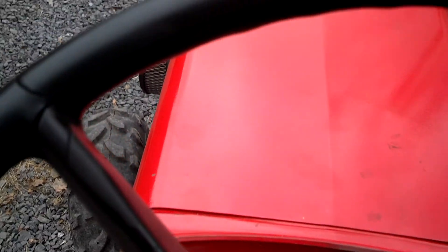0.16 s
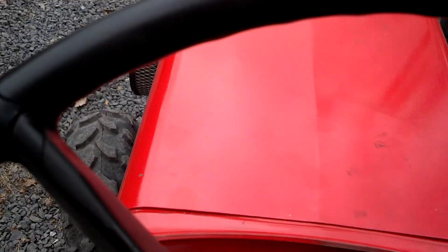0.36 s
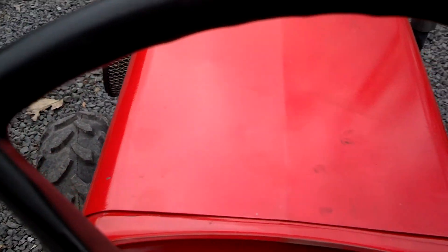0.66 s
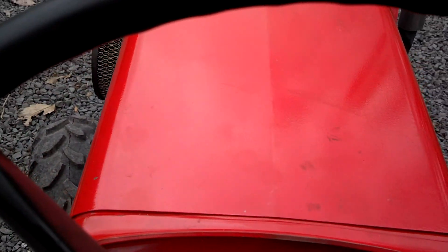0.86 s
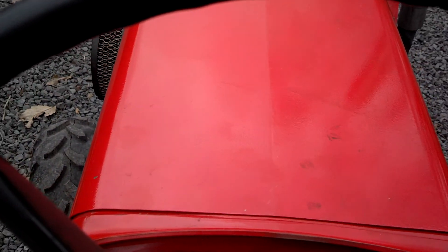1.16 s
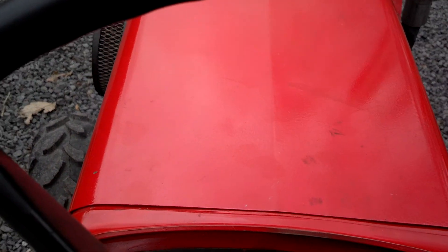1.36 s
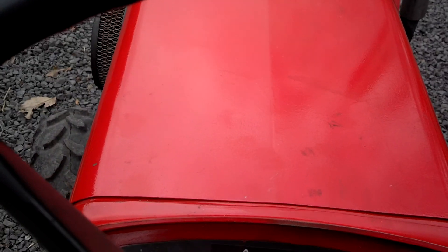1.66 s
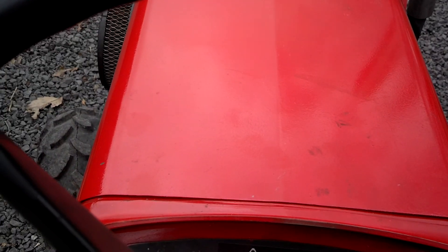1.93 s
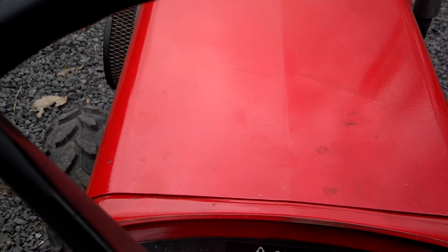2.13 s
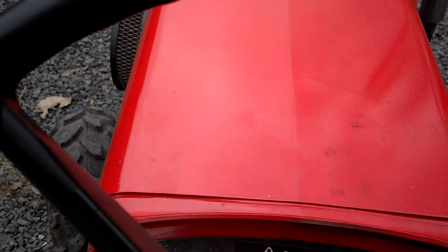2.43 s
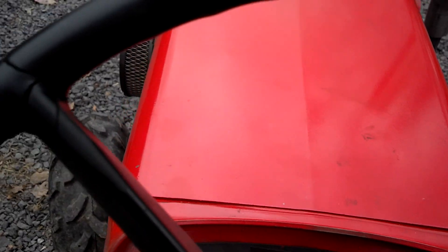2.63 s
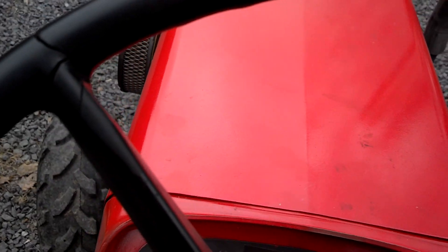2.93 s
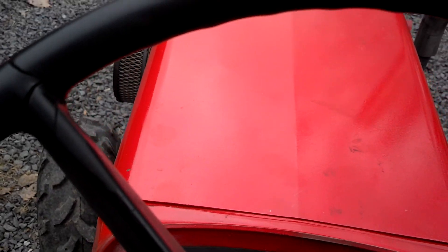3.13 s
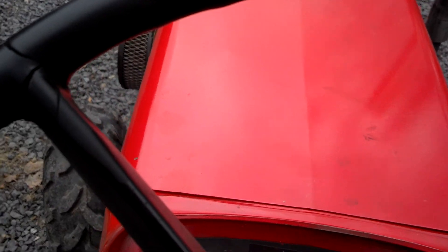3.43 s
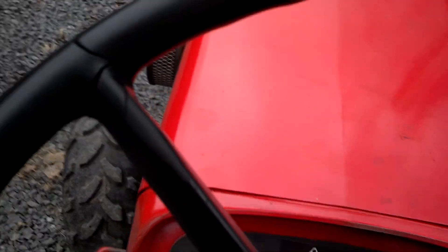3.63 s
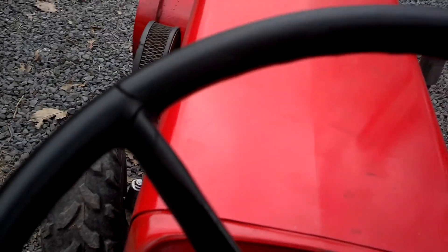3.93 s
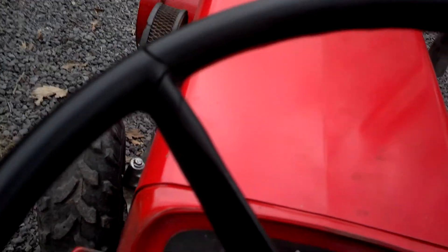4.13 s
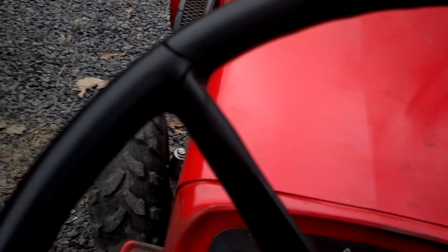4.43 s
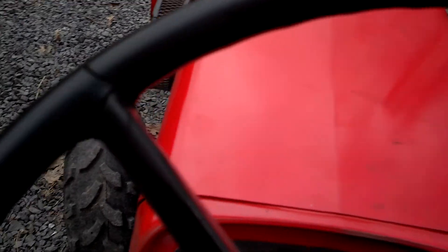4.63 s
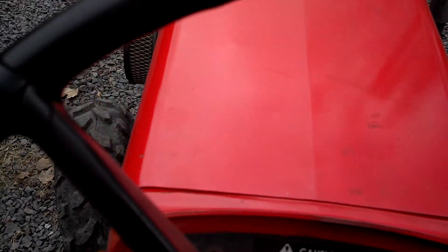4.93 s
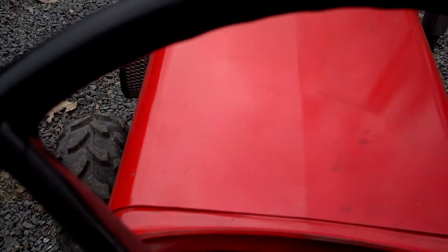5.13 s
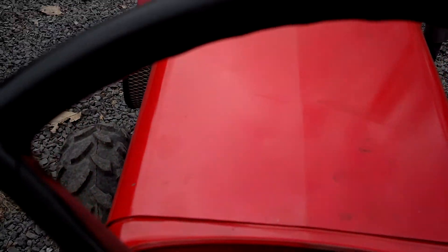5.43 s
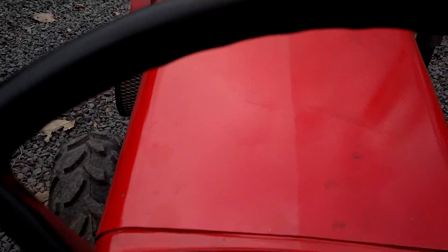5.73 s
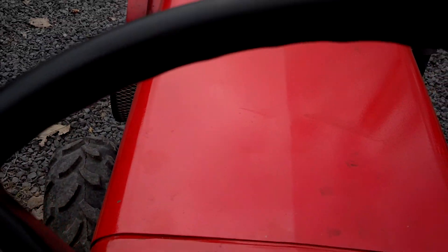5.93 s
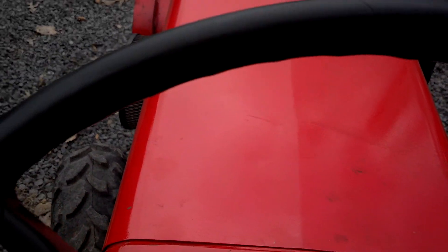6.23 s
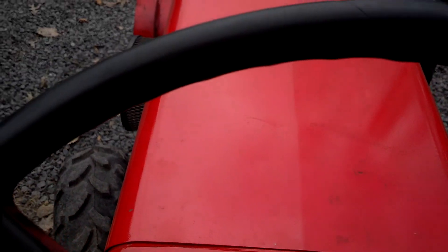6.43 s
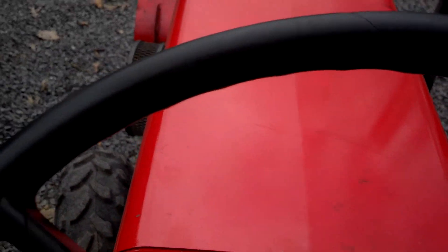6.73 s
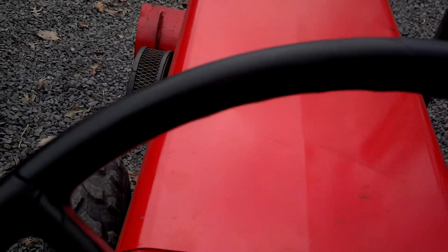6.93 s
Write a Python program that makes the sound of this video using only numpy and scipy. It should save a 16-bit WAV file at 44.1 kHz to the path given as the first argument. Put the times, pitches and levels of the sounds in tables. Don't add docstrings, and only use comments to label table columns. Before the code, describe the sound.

Key click and pinion clunk, then a grinding, thumping engine crank that never fires; a brief clattering pause and a second, wearier failed try.

```python
import sys
import numpy as np
from scipy import signal
from scipy.fft import rfft, irfft, next_fast_len
from scipy.io import wavfile
from scipy.ndimage import uniform_filter1d, map_coordinates

SR = 44100
rng = np.random.default_rng(int(sys.argv[2]) if len(sys.argv) > 2 else 0)


def generate_wav(signal):
    frames = np.transpose(np.atleast_2d(signal))
    scaled = np.clip(frames, -1, 1) * 32767
    pcm = np.round(scaled).astype(np.int16)
    wavfile.write(sys.argv[1], SR, pcm)


def elevation(decibels):
    levels = np.asarray(decibels, float)
    return 10 ** (levels / 20)


N = 312081
TIME = np.arange(N) / SR

# start_s, level_db
AIR_GAIN = [
    (2.5, -55),
    (3.0, -46.5),
    (3.32, -43.5),
    (3.46, -43.5),
    (3.58, -34),
    (3.7, -40.5),
    (3.9, -37),
    (4.8, -37),
    (4.95, -71),
]
# pitch_hz, level_db (per Hz)
RUMBLE = [(25, -53), (60, -3.5), (120, 0.5), (200, 0.5), (350, -2), (700, -7.5), (1200, -15), (2500, -27.5),
          (5000, -74)]
HISS = [(800, -5), (2500, 2), (5000, -7.5), (8000, -12.5), (12000, -12.5), (16000, -7)]
HISS_UNDER_DB = -14

# start_s, level_db (peak), pitch_hz (band centre), t60_s
TICKS = [(0.0004, -18, 13700, 0.019), (2.572, -40, 9000, .04), (2.754, -48, 8940, 0.021),
         (3.031, -38, 11000, 0.029), (3.3455, -49, 5000, 0.013), (3.5035, -41, 12000, 0.16),
         (3.572, -25, 12700, 0.022), (3.867, -41, 8500, .03), (3.8785, -34, 12000, 0.013),
         (3.88, -43, 13000, .03), (3.9, -42, 13500, .08), (4.391, -44, 11000, 0.022),
         (4.8057, -33, 11000, 0.013), (4.8133, -14, 14000, 0.0076), (4.8143, -30, 13540, 0.026),
         (4.8174, -25, 13000, 0.012), (2.4579, -28, 14540, 0.1), (7.06, -44, 11000, 0.046)]
# start_s, level_db (peak), pitch_hz (centre), t60_s
CLICKS = [(0.0162, -2.5, 8200, 0.016), (0.0824, -44, 9700, 0.044), (2.4573, -11, 9360, 0.055),
          (2.939, -34.5, 4390, 0.27), (3.3455, -32, 2530, 0.037), (3.3672, -41, 4020, 0.027),
          (3.502, -21, 4630, 0.097), (3.572, -18, 3500, 0.024), (3.8785, -28, 4500, 0.02),
          (4.3901, -22.5, 6800, 0.03), (4.8285, -4.5, 6180, 0.028), (4.8718, -19, 4700, 0.067),
          (6.6884, -13, 9770, 0.098), (6.853, -38, 2534, 0.04), (7.058, -42, 4560, 0.037)]
# pitch_hz, width_hz, level_db
SWITCH_BODY = [(1870, 450, 8), (4500, 340, 2), (5600, 310, 0), (9100, 360, 6), (10400, 480, -9),
               (14000, 230, -22)]
# start_s, level_db (peak), pitch_hz, t60_s
TINGS = [(.0165, -30, 9100, .046), (.017, -26, 4400, .054), (.018, -28, 6000, .042), (2.599, -47, 3000, .4),
         (2.935, -54, 3350, .4), (3.028, -49, 4700, .04), (4.829, -24, 6950, .03), (4.812, -38, 4200, .04),
         (2.96, -51, 2860, .4), (2.938, -44, 4400, .06), (3.05, -48, 2780, .1), (3.37, -35, 345, .1),
         (3.368, -45, 1750, .08), (3.346, -39, 750, .04), (3.757, -39, 1050, .04), (3.912, -33, 1150, .08),
         (3.925, -33, 600, .1), (3.503, -20, 250, .07), (.345, -33, 2250, .6), (3.503, -13, 680, .07),
         (3.508, -19, 480, .04), (3.503, -24, 620, .08), (3.525, -26, 295, .32), (3.59, -25, 252, .19),
         (3.66, -25, 307, .13), (3.68, -22.5, 287, .13), (3.906, -24, 700, .04), (3.907, -34, 2050, .06),
         (3.93, -27, 326, .1), (4.389, -44, 3450, .08), (4.389, -48, 8750, .18), (4.4, -52, 9600, .16),
         (4.665, -52, 6100, .14), (5.545, -11, 490, .044), (5.543, -14, 965, .06), (5.61, -31, 790, .3),
         (5.72, -31, 725, .3), (4.389, -30, 1650, .03), (4.831, -26, 10700, .03), (4.832, -28, 5600, .07),
         (5.5465, -15.5, 3650, .032), (5.5465, -17, 3400, .037), (5.551, -16, 3180, .054)]
# start_s, level_db (peak)
JINGLES = [
    (4.641, -45.5),
    (4.719, -45.5),
]
# pitch_hz, level_db, t60_s
KEY_MODES = [(3270, -3, .13), (3440, 0, .18), (5750, -16, .12), (6100, -9, .12)]

# start_s, level_db (peak), pitch_hz, t60_s
CLUNKS = [(0.053, -23.5, 332, 0.34), (0.058, -14.5, 189, 0.2), (2.845, -26, 340, 0.059),
          (2.9, -30, 338.5, 0.095), (4.868, -17, 409, 0.14), (2.482, -26, 298.6, 0.26),
          (2.601, -30, 370, 0.047), (2.663, -22, 285, 0.05), (2.87, -32, 303.6, 0.089),
          (3.344, -37, 320, 0.13), (3.501, -17, 236, 0.19), (3.908, -30, 280, 0.23),
          (4.387, -28, 244, 0.18), (4.869, -11, 192, 0.076), (5.537, -17, 935, 0.12),
          (5.77, -22, 80.54, 0.31), (4.855, -20.5, 322, 0.2), (4.893, -24, 223, 0.36),
          (6.713, -15.5, 297.6, 0.11), (6.728, -20.5, 204.6, 0.12), (6.787, -30, 380, 0.077),
          (6.85, -17, 920, 0.049), (6.93, -22, 278.7, 0.067), (7.043, -25, 1030, 0.1)]
CLUNK_RISE_S = 0.0013

# start_s, level_db (load)
ENGAGE = [
    (.1, -55),
    (4.9, -62),
]
# start_s, level_db (load), rise_s, t60_s
SCRAPES = [(.054, -27.5, 0.018, 0.3), (.22, -49, 0.073, 0.5), (2.598, -33, 0.012, 0.083),
           (2.782, -43, 0.015, 0.23), (2.825, -39, 0.01, 0.34), (2.885, -39, 0.017, 0.31),
           (2.94, -46, 0.02, 0.19), (4.84, -30, 0.0015, 0.61), (4.88, -44, 0.0085, 0.19),
           (5.55, -41, 0.0051, .2), (6.85, -41.5, 0.0062, 0.47), (6.97, -41, 0.019, 0.57),
           (7.07, -38, 0.019, 0.29)]
# start_s, pitch_hz (tooth mesh), whine_db, load_db
SPIN_FIRST = [
    (0.28, 335.5, -62, -41.5),
    (.32, 373.8, -33.5, -37),
    (.35, 423, -26.5, -36),
    (0.385, 467.5, -22, -32),
    (0.421, 518.7, -24.5, -28.5),
    (.465, 501.4, -19.5, -29.5),
    (.53, 518, -25.5, -29.5),
    (0.57, 536.6, -39, -30.5),
    (.606, 509, -22, -29),
    (.66, 526.3, -31, -30),
]
SPIN_SECOND = [(4.985, 358.4, -38, -45), (5.045, 373, -31, -33.5), (5.075, 390, -26.5, -37.5),
               (5.106, 383.3, -34.5, -38), (5.131, 371.6, -30, -46), (5.157, 379.3, -36, -36),
               (5.174, 456.3, -22, -31.5), (5.25, 453.5, -19.5, -31.5), (5.279, 487.7, -21, -30),
               (5.305, 504.6, -27, -24.5), (5.335, 518.5, -21.5, -29), (5.375, 518, -34, -31.5),
               (5.41, 537, -33, -29), (5.53, 577, -32, -27.5)]
# start_s, pitch_hz (tooth mesh), whine_db, load_db
RUN_FIRST = [
    (.74, 593, -41.5, -29),
    (.87, 618.2, -32, -29),
    (1.05, 655.4, -31, -26.5),
    (1.3, 665, -27.5, -25),
    (1.651, 665, -29, -24.5),
    (1.95, 663.6, -25.5, -25),
    (2.05, 663, -30, -27),
    (2.46, 660.3, -29.5, -24),
]
RUN_SECOND = [
    (5.62, 599, -58, -29),
    (5.8, 652.6, -39, -26.5),
    (5.95, 672, -38, -26.5),
    (6.1, 668, -33.5, -26.5),
    (6.23, 664.5, -27.5, -27),
    (6.399, 656.6, -31.5, -26.5),
    (6.69, 648, -28.5, -24),
]
SAG_DB, SAG_AFTER_S, SAG_WIDTH_S = -2, 0.069, 0.013
RELEASE_DROP_DB, COAST_DB_PER_S = -6, -49

ORDERS_CLEAN = [2, -7, -10, -9.5, -11]
ORDERS_CHATTER = [-2, -2.5, -16, -40, -16.5]
# mesh_multiple, level_db
HALF_ORDERS = [(1.5, -17), (2.5, -15.5), (3.5, -28)]
# pitch_hz, level_db
HOUSING = [(450, 0), (770, 2.5), (920, 4.5), (1190, 9), (1340, -6), (1500, 6), (1810, -7), (2050, 5.5),
           (2170, 0), (2260, 11.5), (2350, -6)]
OVERTONES_GROW, FULL_WHINE_DB = 0.26, -10.5
STALL_HZ, STALL_FLUTTER_DB = 447, -0.5
SECOND_TRY_S, TIRED_JITTER, TIRED_DB = 4, 0.0025, -5

# pitch_hz, width_hz, level_db
CASING = [(192, 83, -3), (360.4, 34, 2), (438.5, 13.7, -1.5), (620, 134, -1.5), (648, 12, 1),
          (755, 34, -2.5), (890, 28, 2), (987, 54, 7), (1030, 19, 8.5), (1150, 32, 2), (1213, 34, 2.5),
          (1329, 11, 2), (1387, 200, 1), (1525, 56, 0), (1663, 35, 5), (1787, 25, 2), (1975, 128, 2.5),
          (2233, 35, 3), (2355, 34, 3.5), (2476, 24, 0), (2998, 58, 4), (3390, 220, -5.5), (3600, 25, -5),
          (3861, 34, 4), (3970, 17, 4), (4390, 260, 0), (5410, 830, 0), (7040, 133, 2), (7050, 830, -0.5),
          (10040, 170, -23), (10400, 3400, -9.5), (12700, 630, -4.5), (14400, 930, -4.5), (16400, 130, -11)]
# start_s, level_db, rise_s, t60_s
RASPS = [
    (5.62, -39, 0.045, 1.85),
]
# start_s, level_db, rise_s, t60_s
SCUFFS = [(.04, -48, .005, 0.19), (.088, -37.5, 0.021, 0.076), (2.47, -45, 0.004, 0.1),
          (2.59, -52, 0.083, 0.2), (3.03, -49, 0.021, 0.17), (4.88, -41.5, 0.02, 0.19),
          (5.55, -48, 0.0058, 1), (5.3, -55, 0.11, 0.51), (6.7, -35, 0.0074, 0.076), (6.79, -51, .04, 0.21),
          (6.935, -58, 0.017, 0.13), (7.07, -56, 0.014, 0.21)]
LOUD_DB = -27
BOOM_DB, BOOM_GROWS, SHAKE_DB = -26.5, 0.73, -11
IDLE_BOOM_DB, STRAIN_DB = -37, 4
CLEAN_BOOM_DB, BOOM_CHATTER_DB = -41, -6
REBOUND_DB, REBOUND_AFTER_S, REBOUND_WIDTH_S = 3.5, 0.109, 0.02
RASP_DB, RASP_GROWS, RASP_CHATTER_DB = -50.5, 1.3, 7.5
FIZZ_DB, FIZZ_GROWS = -56.5, 0.76

# start_s, level_db (peak)
VALVES = [
    (0.487, -23),
    (0.7994, -44),
    (1.1101, -29),
    (1.4276, -28),
    (1.7594, -44),
    (2.0784, -31),
    (5.318, -27.5),
    (5.988, -29),
    (6.3199, -30),
    (6.6343, -25),
]
VALVE_HZ, VALVE_T60_S = 11000, 0.067
# start_s, level_db (peak)
THUMPS = [
    (0.684, -18.5),
    (1.017, -13),
    (1.333, -11.5),
    (1.655, -11),
    (1.966, -12.5),
    (2.291, -11),
    (5.245, -18),
    (5.895, -15),
    (6.208, -11),
    (6.534, -11),
]
THUMP_HZ, THUMP_T60_S, THUMP_RISE_S = 262, 0.05, 0.01
HEAVE_HZ, HEAVE_DB = 94.77, -10

# start_s, level_db (peak)
RATTLES = [(2.52, -32), (2.56, -29), (2.601, -37.5), (2.715, -36), (2.772, -37), (2.82, -32),
           (2.842, -30.5), (2.876, -29), (2.9, -37), (6.76, -31), (6.799, -34), (6.853, -39), (6.901, -37)]
# pitch_hz, level_db, t60_s
GEAR_MODES = [(1020, -1, 0.067), (1410, -5, .05), (1706, 4, 0.085), (1830, 1, 0.058), (2330, -2, 0.042),
              (3020, -9.5, 0.11), (3900, -27, 0.05)]
# start_s, level_db, rise_s, t60_s
RINGS = [
    (2.55, -36.5, 0.033, 0.48),
    (2.78, -39, 0.011, 0.25),
    (2.9, -42.5, 0.052, 1.53),
    (6.726, -32.5, 0.033, 1.22),
    (6.886, -41.5, 0.013, 0.7),
    (7.07, -38, 0.052, 0.35),
]
FLYWHEEL_HZ = 1170

# pitch_hz, level_db, phase_rad (extra)
PORT = [(60, .5, -.1), (95, .5, 0), (130, 2, -.7), (200, 0.5, -1.6), (370, -1.5, -2.25), (430, -4, -2.1),
        (485, -18, -1), (520, -12, .2), (590, -12, -.6), (650, -6, -.5), (950, -1, -.55), (1400, 0, 0),
        (2050, -3, -.1)]
PORT_TREBLE = (3300, .5, .1)
PORT_LAG_S = 16 / SR
SCATTER_DB = -11.5
CEILING, TOP_HZ = 0.48, 15870


def unit(x):
    return x / np.sqrt(np.mean(x ** 2) + 1e-20)


def along(points, hz, column=1):
    p = np.transpose(points)
    return np.interp(np.log(hz + 1), np.log(p[0] + 1), p[column])


def curves(rows):
    s, *columns = np.transpose(rows)
    return [np.interp(TIME, s, column) for column in columns]


def wobble(rate):
    knots = rng.standard_normal(int(N * rate / SR) + 4)
    return map_coordinates(knots, [np.arange(N) * rate / SR])


def filtered(x, response):
    m = next_fast_len(len(x) + 8192)
    return irfft(rfft(x, m) * response(np.fft.rfftfreq(m, 1 / SR)), m)[:len(x)]


def modes(table):
    def response(f):
        return sum((-1) ** k * elevation(db) * 1j * f * width / (hz * hz - f * f + 1j * f * width)
                   for k, (hz, width, db) in enumerate(table))
    return response


def band(lo_hz, hi_hz, order=3):
    return lambda f: 1 / np.sqrt((1 + (lo_hz / (f + 1)) ** (2 * order)) * (1 + (f / hi_hz) ** (2 * order)))


def add(track, s, sound):
    part = track[max(round(s * SR), 0):][:len(sound)]
    part += sound[:len(part)]


def swells(table):
    power = 0
    for s, db, rise, t60 in table:
        before, after = np.minimum(TIME - s, 0), np.maximum(TIME - s, 0)
        power = power + elevation(2 * db - 20 * (before / rise) ** 2 - 120 * after / t60)
    return power


def after_thumps(delay_s, width_s):
    return sum(np.exp(-((TIME - s - delay_s) / width_s) ** 2) for s, _ in THUMPS)


def air():
    def noise(spectrum):
        return unit(filtered(rng.standard_normal(N), lambda f: elevation(along(spectrum, f))))

    rumble_db, = curves(AIR_GAIN)
    lumps = elevation(rumble_db + 0.46 * wobble(18))
    hiss_gain = elevation(rumble_db + HISS_UNDER_DB + 0.8 * wobble(4.63))
    shared = lumps * noise(RUMBLE) + hiss_gain * noise(HISS)
    own = elevation(4.0) * lumps * filtered(noise(RUMBLE), band(28, 700))
    return shared, own


def ticks():
    out, t = np.zeros(N), np.arange(SR // 8) / SR
    for s, db, hz, t60 in TICKS:
        crack = rng.standard_normal(len(t)) * elevation(-60 * t / t60)
        crack = filtered(crack, lambda f: modes([(hz, 0.6 * hz, 0)])(f) ** 2 + 0.26 * band(1500, 17000)(f))
        add(out, s, elevation(db) * crack / np.abs(crack).max())
    return out


def clicks(table, rise, snap):
    out, t = np.zeros(N), np.arange(SR // 8) / SR
    for s, db, hz, t60 in table:
        crack = rng.standard_normal(len(t)) * elevation(-60 * t / t60) * (1 - np.exp(-t / rise))
        crack[8] += snap

        def body(f):
            tilt = modes([(hz, 0.7 * hz, 0)])(f) + 0.35
            return (modes(SWITCH_BODY)(f) + 0.4) * tilt * band(700, 17000)(f)

        crack = filtered(crack, body)
        add(out, s, elevation(db - 6.5) * crack / np.abs(crack).max())
    return out


def tings():
    out, t = np.zeros(N), np.arange(SR // 2) / SR
    jingles = [(s, db + mode_db, hz, t60) for s, db in JINGLES for hz, mode_db, t60 in KEY_MODES]
    for s, db, hz, t60 in list(TINGS) + jingles:
        envelope = elevation(db - 60 * t / t60) * (1 - np.exp(-t / 0.00078))
        add(out, s, envelope * np.sin(2 * np.pi * hz * t))
    return out


def thuds(table, rise, noise_db, top_hz):
    out, t = np.zeros(N), np.arange(SR // 4) / SR
    for s, db, hz, t60 in table:
        attack = 1 - np.exp(-(t / max(rise, 0.001)) ** 2)
        shape = attack * elevation(-60 * np.maximum(t - rise, 0) / t60)
        puff = unit(filtered(rng.standard_normal(len(t)), band(134, top_hz)))
        add(out, s, elevation(db - 1.5) * shape * (np.sin(2 * np.pi * hz * t) + elevation(noise_db) * puff))
    return out


def clunks():
    return thuds(CLUNKS, rise=CLUNK_RISE_S, noise_db=-7.5, top_hz=1230)


def load():
    power, on = swells(SCRAPES) + 1e-10, np.zeros(N)
    sag_db = SAG_DB * after_thumps(SAG_AFTER_S, SAG_WIDTH_S)
    for seat, spin, run in zip(ENGAGE, (SPIN_FIRST, SPIN_SECOND), (RUN_FIRST, RUN_SECOND)):
        driven_db, = curves([seat] + [(row[0], row[3]) for row in list(spin) + list(run)])
        engaged = TIME > seat[0] - 0.04
        since = TIME - run[-1][0]
        coast_db = RELEASE_DROP_DB * np.minimum(since / 0.011, 1) + COAST_DB_PER_S * since
        power = power + engaged * elevation(2 * (driven_db + np.where(since > 0, coast_db, sag_db)))
        on = on + engaged * (since < 0)
    return 10 * np.log10(power), uniform_filter1d(on, size=900), sag_db


def whine():
    def hush(s, row):
        return [(s, row[1], -90, 0)]

    first = hush(0.12, SPIN_FIRST[0]) + list(SPIN_FIRST) + list(RUN_FIRST) + hush(2.49, RUN_FIRST[-1])
    second = hush(4.93, SPIN_SECOND[0]) + list(SPIN_SECOND) + list(RUN_SECOND) + hush(6.75, RUN_SECOND[-1])
    mesh_hz, level_db, _ = curves(first + second)
    chatter = np.clip((mesh_hz - 585) / 55, 0, 1)
    clean = 1 - chatter
    tired = (TIME > SECOND_TRY_S) * clean
    unsure = np.clip((mesh_hz - 520) / 30, 0, 1)
    jitter = 0.003 + tired * TIRED_JITTER + 0.0075 * chatter + 0.011 * unsure * clean
    turn = 2 * np.pi * np.cumsum(mesh_hz * (1 + jitter * wobble(60))) / SR
    stall_db = STALL_FLUTTER_DB * np.clip((STALL_HZ - mesh_hz) / 30, 0, 1)

    def flutter_db():
        return (1.3 + 2.6 * unsure + stall_db) * wobble(55) + 1.4 * chatter * wobble(17)

    tone = np.zeros(N)
    for k, (clean_db, chatter_db) in enumerate(zip(ORDERS_CLEAN, ORDERS_CHATTER)):
        fade_db = (k > 0) * OVERTONES_GROW * (level_db - FULL_WHINE_DB)
        housed_db = clean_db + fade_db + along(HOUSING, (k + 1) * mesh_hz)
        order_db = chatter_db * chatter + housed_db * clean + (k > 3) * TIRED_DB * tired
        tone += elevation(level_db + order_db + flutter_db()) * np.sin((k + 1) * turn + k * k * np.pi / 3)
    for multiple, db in HALF_ORDERS:
        tone += chatter * elevation(level_db + db + flutter_db()) * np.sin(multiple * turn)
    return tone, turn, np.clip((mesh_hz - 562) / 45, 0, 1)


def casing_grind(turn):
    tooth, since = np.divmod(turn / (2 * np.pi), 1)
    size = elevation(1.8 * rng.standard_normal(6000))[tooth.astype(int)]
    blows = (1 + 1.1 * size * np.exp(-4.5 * since)) * elevation(0.7 * wobble(90)) * rng.standard_normal(N)
    return filtered(blows, lambda f: np.sqrt(sum(abs(modes([m])(f)) ** 2 for m in CASING) + elevation(-39.0) ** 2))


def starter():
    tone, turn, chatter = whine()
    load_db, on, sag_db = load()
    over_db = load_db - LOUD_DB
    rung = casing_grind(turn)

    mesh_boom_db = on * (CLEAN_BOOM_DB * (1 - chatter) + BOOM_CHATTER_DB * chatter)
    mesh_boom = elevation(BOOM_DB + BOOM_GROWS * over_db + mesh_boom_db)
    motor_hum = on * elevation(IDLE_BOOM_DB + sag_db + STRAIN_DB * np.clip(-over_db / 15, 0, 1))
    rebound_db = REBOUND_DB * after_thumps(REBOUND_AFTER_S, REBOUND_WIDTH_S)
    boom = np.hypot(mesh_boom, motor_hum) * elevation(1.7 * wobble(16) + rebound_db)

    rasp = elevation(RASP_DB + RASP_GROWS * over_db + RASP_CHATTER_DB * chatter * on + 1.5 * wobble(14))
    rasp = np.sqrt(rasp ** 2 + swells(RASPS) * on)
    fizz = np.sqrt(elevation(2 * (FIZZ_DB + FIZZ_GROWS * over_db)) + swells(SCUFFS))
    grind = elevation(load_db + 0.81 * wobble(28))
    layers = [(boom * elevation(SHAKE_DB), 55, 115), (boom, 170, 480), (grind, 500, 2850),
              (rasp, 2850, 8000), (fizz, 8300, 17000)]
    return tone + sum(gain * unit(filtered(rung, band(lo, hi, order=4))) for gain, lo, hi in layers)


def valve_leaks():
    leaks = clicks([(s, db, VALVE_HZ, VALVE_T60_S) for s, db in VALVES], rise=0.0052, snap=0)
    return filtered(leaks, band(8400, 15220))


def compressions():
    swings = ((THUMP_HZ, 0), (HEAVE_HZ, HEAVE_DB))
    rows = [(s, db + 1.0 + under, hz, THUMP_T60_S) for s, db in THUMPS for hz, under in swings]
    return thuds(rows, rise=THUMP_RISE_S, noise_db=-16, top_hz=500)


def rattles():
    out, t = np.zeros(N), np.arange(SR // 4) / SR
    attack = 1 - np.exp(-t / 0.0051)
    for s, db in RATTLES:
        for hz, mode_db, t60 in GEAR_MODES:
            strength, detune = rng.standard_normal(2)
            envelope = elevation(db + mode_db + 2.5 * strength - 60 * t / t60) * attack
            add(out, s, envelope * np.sin(2 * np.pi * hz * (1 + 0.03 * detune) * t))
    return out


def flywheel():
    phase = 2 * np.pi * np.cumsum(FLYWHEEL_HZ + 1.8 * wobble(25.02)) / SR
    return np.sqrt(swells(RINGS)) * np.sin(phase) * elevation(1.2 * wobble(30))


def ports(x):
    points = list(PORT) + [PORT_TREBLE]

    def near(f):
        phase = along(points, f, column=2) - 2 * np.pi * f * PORT_LAG_S
        return -elevation(along(points, f)) * np.exp(1j * phase)

    t = np.arange(SR // 10) / SR
    tail = rng.standard_normal(len(t)) * elevation(-60 * t / 0.099)
    strays = filtered(x, lambda f: elevation(-9) * band(430, 620)(f) + elevation(SCATTER_DB) * band(1700, 8000)(f))
    scattered = signal.fftconvolve(strays, tail / np.linalg.norm(tail))[:N]
    return np.array([x, filtered(x, near) + scattered])


def scene():
    shared, own = air()
    small = ticks() + clicks(CLICKS, rise=0.0018, snap=1.4) + tings() + valve_leaks() + rattles()
    tractor = clunks() + starter() + compressions() + flywheel()
    return ports(tractor + small + shared) + own * [[0], [1]]


def roll_off(x):
    return signal.sosfilt(signal.butter(12, 17060, fs=SR, output="sos"), x)


def record(dry):
    rounded = dry / (1 + np.abs(dry / CEILING) ** 4) ** (1 / 4)
    colour = lambda f: (1j * f / (130 + 1j * f)) ** 2 * (f < TOP_HZ)
    return roll_off(np.array([filtered(channel, colour) for channel in rounded]))


dry = scene()
out = record(dry)
generate_wav(out)
```